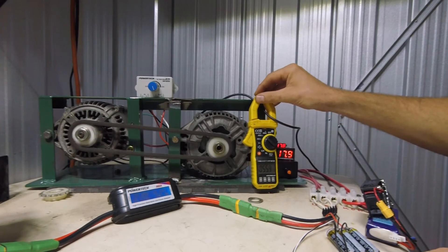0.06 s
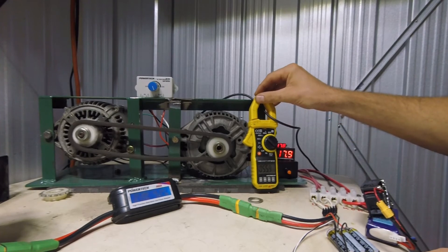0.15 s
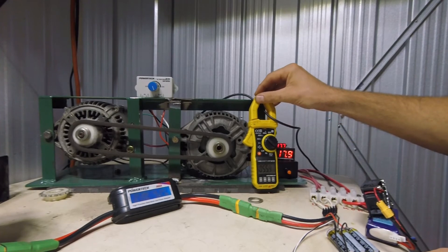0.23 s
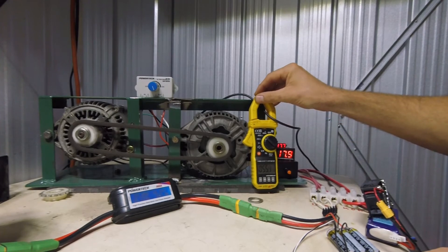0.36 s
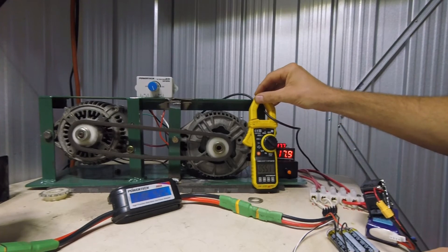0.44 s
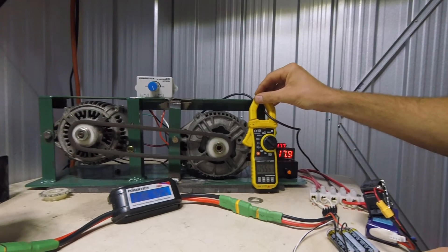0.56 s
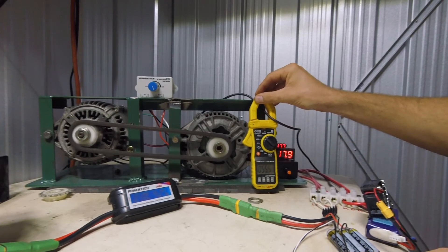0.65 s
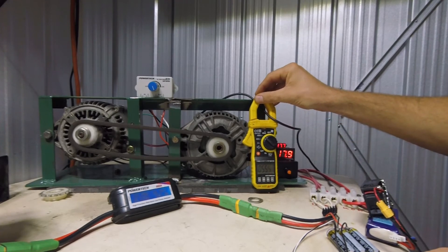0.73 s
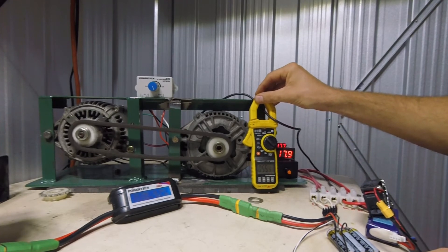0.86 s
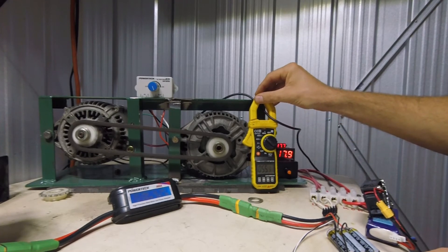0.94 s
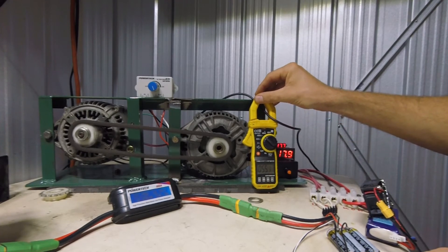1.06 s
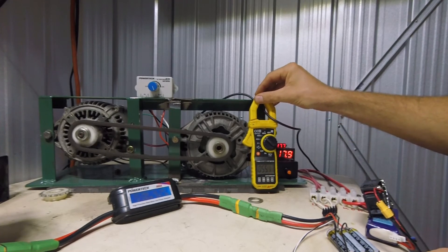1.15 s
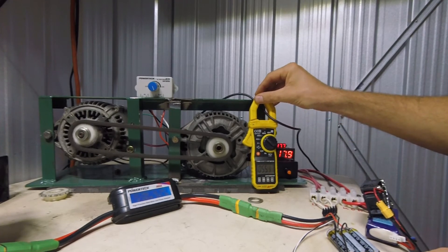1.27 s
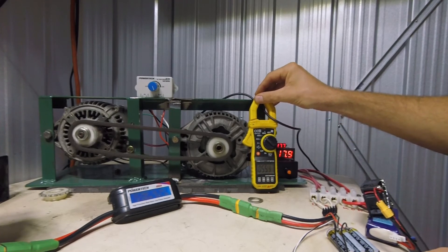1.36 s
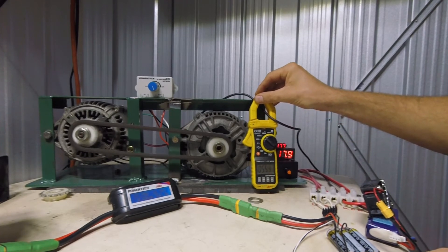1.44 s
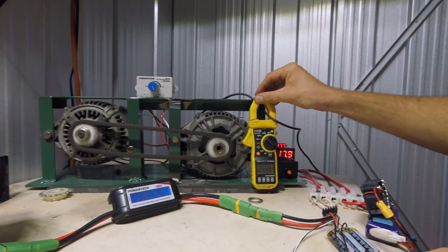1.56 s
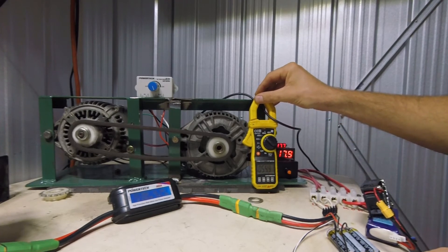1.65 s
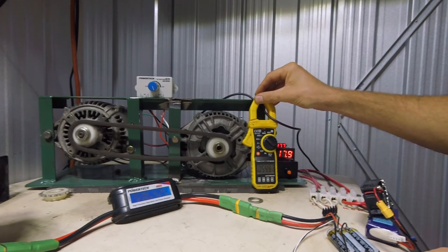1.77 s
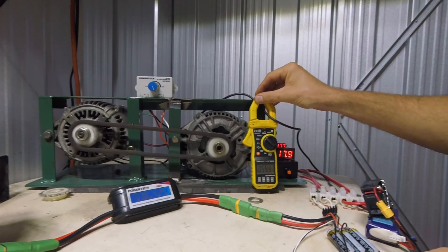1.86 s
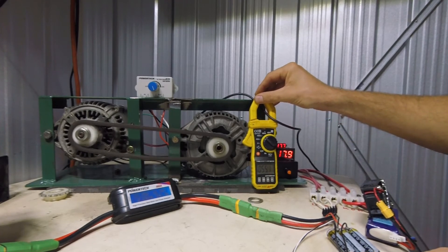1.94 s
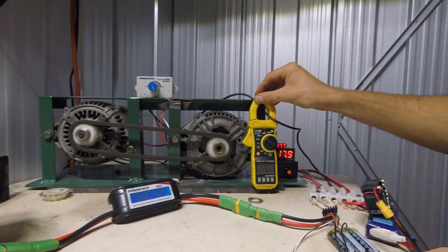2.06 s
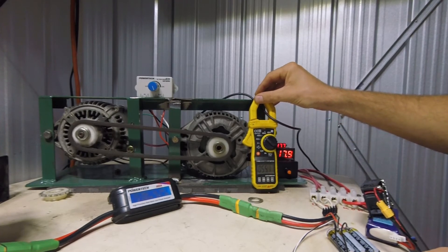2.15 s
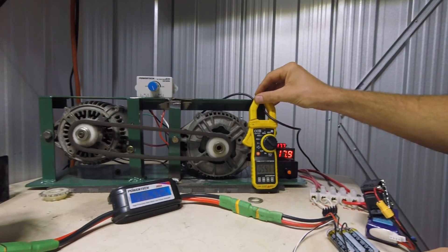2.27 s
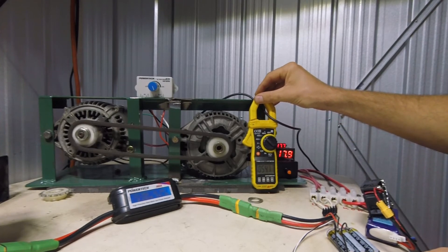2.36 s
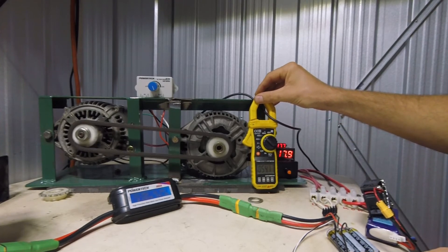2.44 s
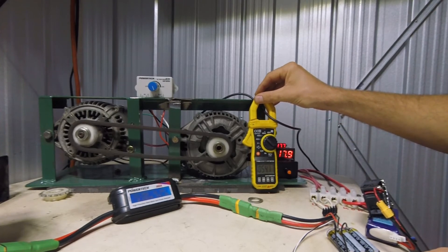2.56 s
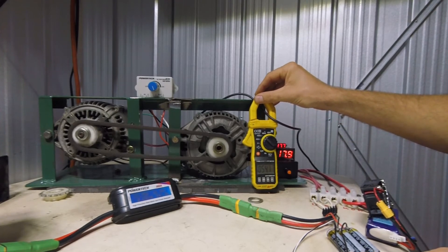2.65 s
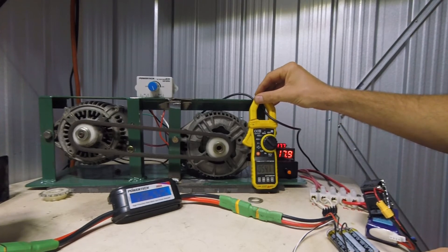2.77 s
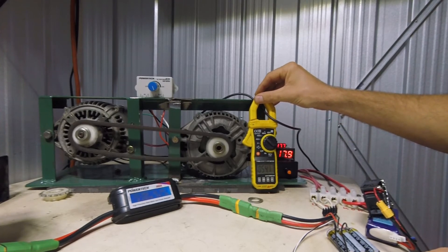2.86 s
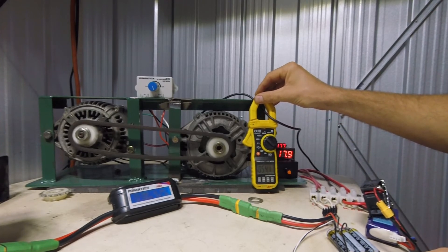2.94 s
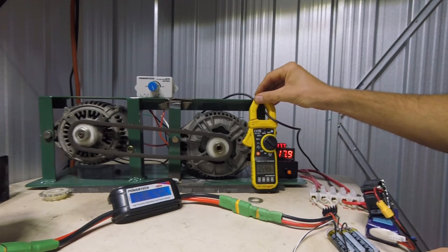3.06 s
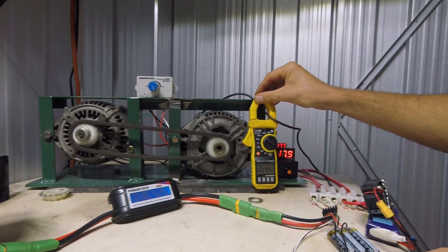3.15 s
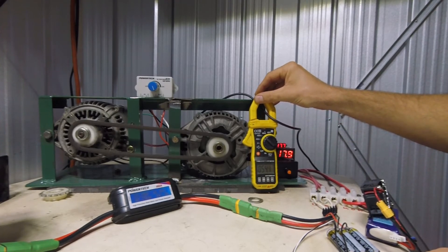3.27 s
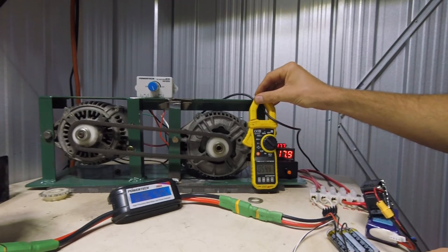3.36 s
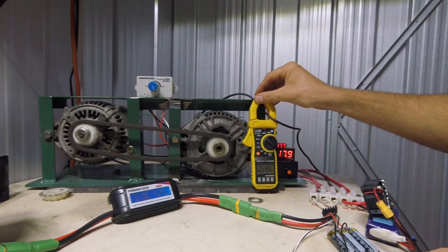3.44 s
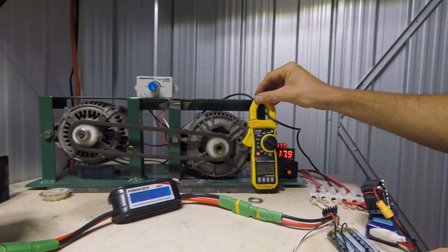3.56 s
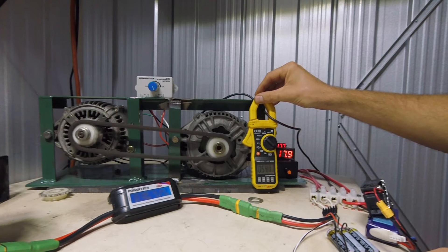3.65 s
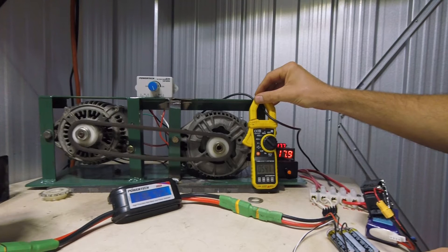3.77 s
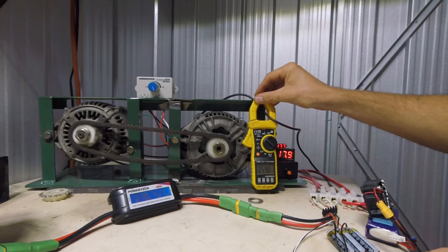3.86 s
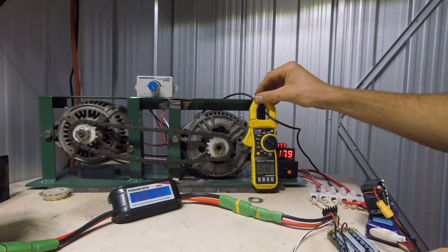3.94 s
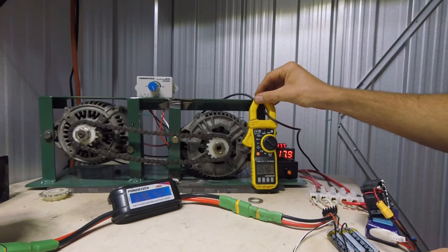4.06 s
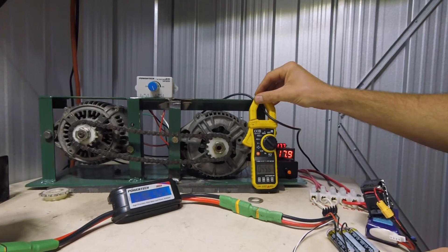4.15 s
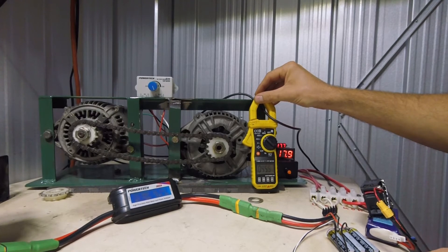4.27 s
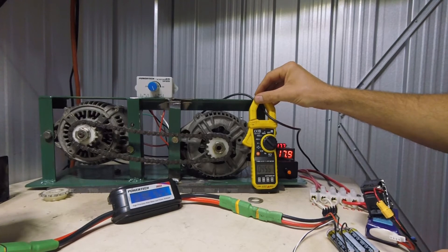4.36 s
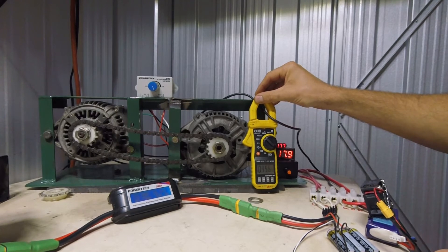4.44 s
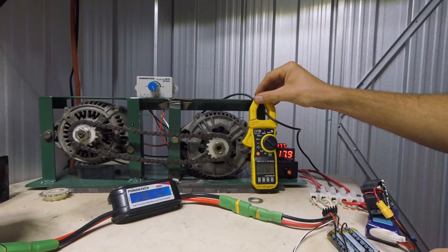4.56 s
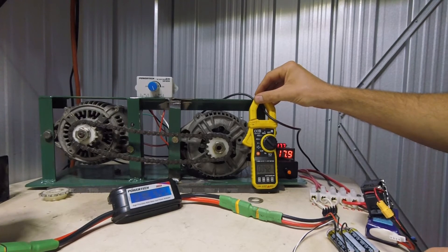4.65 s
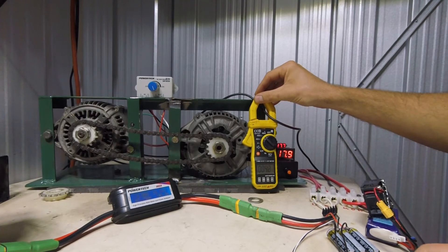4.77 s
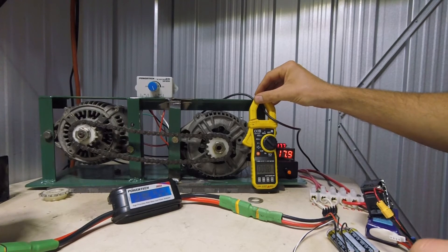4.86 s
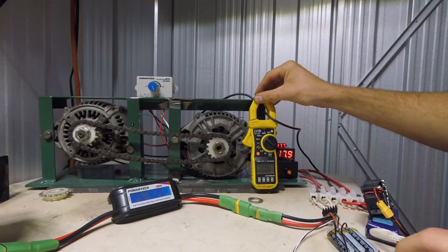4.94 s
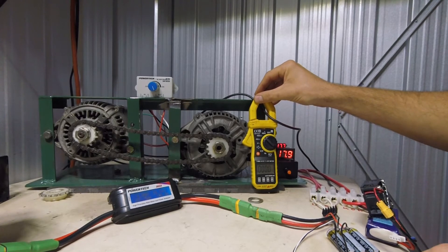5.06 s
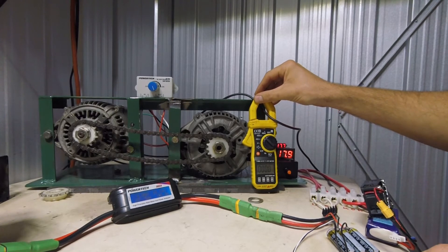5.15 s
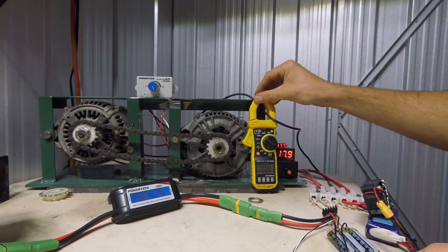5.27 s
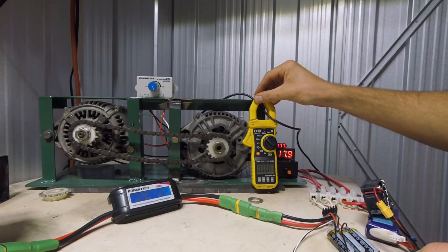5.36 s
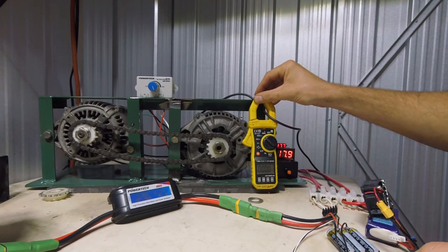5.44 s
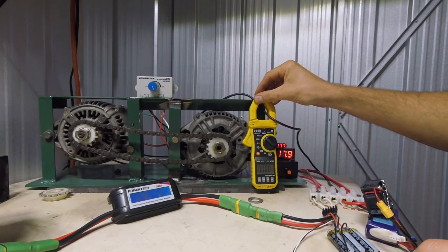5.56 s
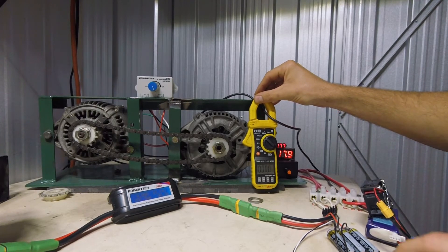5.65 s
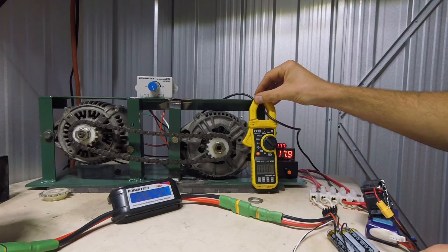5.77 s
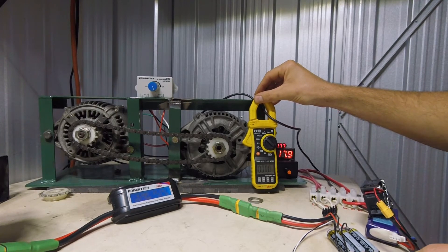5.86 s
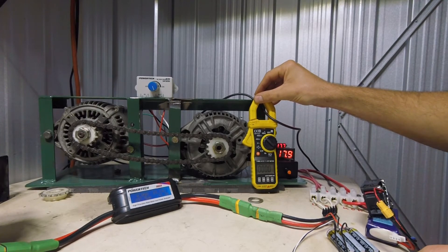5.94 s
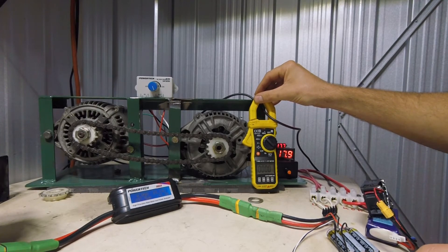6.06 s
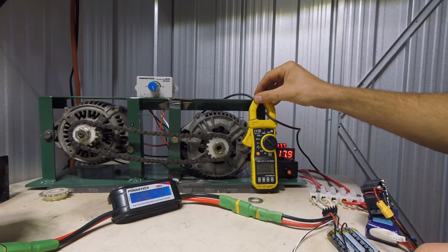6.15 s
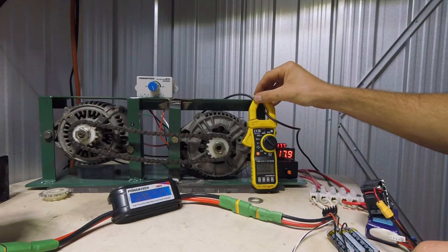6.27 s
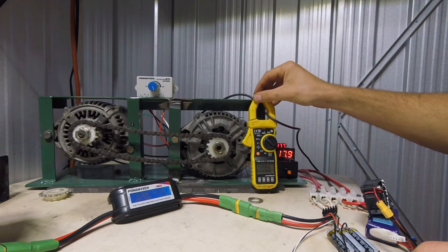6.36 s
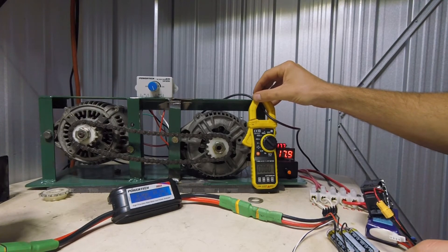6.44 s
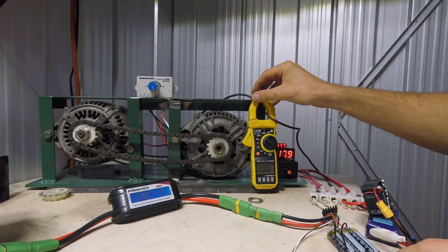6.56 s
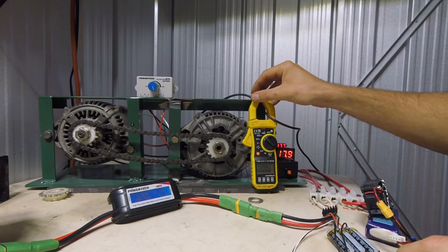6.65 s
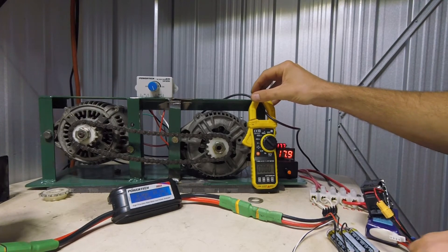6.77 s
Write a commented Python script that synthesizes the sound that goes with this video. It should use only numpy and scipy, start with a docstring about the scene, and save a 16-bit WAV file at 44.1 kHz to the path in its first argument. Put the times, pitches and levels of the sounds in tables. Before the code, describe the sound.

A loud, buzzing low drone with wavering metallic singing and fast chain chatter fills a small metal shed, heard from the bench. Thin panels boom now and then. The machine suddenly jams, clanks and drops out; loose parts shudder rapidly, then calm as the bench settles. Small taps follow about a second later, leaving thin fan whine and soft air rush.

```python
"""A car alternator wired as a motor drives a second alternator by a roller chain, on a steel frame in a tin shed.
Its fourteen poles hum as sine waves, noisy torque steps ring frame and housings, and the chain ticks and hisses.
The drive stalls with jolts that ring the frame; the hum, shaking and chain fade away, and the bench rocks itself
still amid rattling parts. Panels boom and ring, a few light taps follow, and a small fan whines throughout."""
import sys
import numpy as np
from scipy import signal
from scipy.fft import rfft, irfft
from scipy.io import wavfile
from scipy.ndimage import uniform_filter1d, minimum_filter1d

SR = 44100
rng = np.random.default_rng(int(sys.argv[2]) if len(sys.argv) > 2 else 0)


def master(y):
    """Save y as 16-bit WAV."""
    cut = np.clip(np.atleast_2d(y).T, -1, 1)
    pcm = np.round(cut * 32767)  # scale
    wavfile.write(sys.argv[1], SR, pcm.astype(np.int16))


N = 300321
T = np.arange(N) / SR  # time of each sample [s]

# ways the frame and bench vibrate: (pitch [Hz], width [Hz], level when driven by noise of rms 1 [dB])
FRAME = [(49.9, 7.5, -28), (88.2, 5.5, -32.5), (124.9, 4, -36.5), (149.5, 7.7, -41.5), (183.8, 15, -32.5),
         (210.5, 14.4, -33.5), (247, 33, -49), (293.5, 21.3, -24.5), (316.5, 20, -30.5), (360, 7.9, -28),
         (395.4, 11.7, -39), (491.5, 38, -33)]
# colour of loose parts rattling on the bench: (frequency [Hz], relative level per Hz [dB])
RATTLE = [(20, -10), (35, 7), (55, -2), (85, 2), (120, -15.5), (160, -12.5), (210, -7.5), (260, -21.5),
          (400, -26.5), (900, -46), (4000, -100)]


def amp(db):
    """Turns decibels into a gain."""
    return 10 ** (np.asarray(db) / 20)


def unit(x):
    """Scales a sound to rms 1."""
    return x / np.sqrt(np.mean(x ** 2) + 1e-20)


def since(s):
    """Seconds since a moment; zero before it."""
    return np.maximum(T - s, 0)


def curves(rows):
    """Joins each column of a table by straight lines in time."""
    s, *columns = np.transpose(rows)
    return [np.interp(T, s, c) for c in columns]


def read(points, hz):
    """Reads a table of values between its points, on a log-frequency axis."""
    f, value = np.transpose(points)
    return np.interp(np.log(hz + 1), np.log(f + 1), value)


def drift(hz):
    """Slow random wandering of rms 1; changes much faster than the given rate are smoothed out."""
    f = np.fft.rfftfreq(N, 1 / SR)
    spectrum = rfft(rng.standard_normal(N))
    smooth = np.exp(-(f / hz) ** 2) * (f > 0)
    return unit(irfft(spectrum * smooth, N))


def colour(x, points, size=8192):
    """Filters a sound to the given spectrum, with no sound ahead of its cause and filter energy 1."""
    hz = abs(np.fft.fftfreq(size, 1 / SR))
    log_gain = np.log(amp(read(points, hz)))
    # this choice of phase packs the energy right after the cause
    response = np.exp(np.conj(signal.hilbert(log_gain)))
    taps = np.fft.ifft(response).real[:size // 2]
    return signal.oaconvolve(x, taps / np.linalg.norm(taps))[:N]


def ring(x, modes):
    """Lets a force ring damped modes that take a moment to build up; a wider mode dies sooner."""
    t, body = T[:SR], 0
    for k, (hz, width, db) in enumerate(modes):
        fall = np.exp(-np.pi * width * t)
        build_up = 1 - fall ** 6
        mode = fall * build_up * np.sin(2 * np.pi * hz * t)
        sign = (-1) ** k
        body = body + sign * amp(db) * mode / np.linalg.norm(mode)
    return signal.oaconvolve(x, body)[:N]


def strikes(cycles):
    """Makes a click at the start of each cycle."""
    return np.diff(np.floor(cycles), prepend=np.floor(cycles[0]))


def tone(cycles, db):
    """A sine of the given rms level, starting at a random point of its cycle."""
    return np.sqrt(2) * amp(db) * np.sin(2 * np.pi * (cycles + rng.random()))


def shed(x, wet_db):
    """Adds scattered random reflections from the tin walls; each band dies at its own pace, the treble first."""
    # time to fall by 60 dB: (frequency [Hz], time [s])
    room = [(60, .35), (300, 0.19), (1500, 1), (5000, 0.22), (14000, 0.03)]
    length = SR // 2
    kept = rng.random(length) < .06
    taps = rng.standard_normal(length) * kept * (T[:length] > .004)
    hz, t, z = signal.stft(taps, SR, nperseg=256)
    fading = amp(-60 * t / read(room, hz)[:, None])
    tail = signal.istft(z * fading, SR, nperseg=256)[1]
    return x + amp(wet_db) * signal.oaconvolve(x, tail / np.linalg.norm(tail))[:N]


def fan():
    """The fan and power supply whine in thin, slightly wavering sines, amid a soft rush of filtered noise."""
    # whine of the fan and power supply: (pitch [Hz], level before wavering [dB])
    whine_lines = [(495.3, -52), (689.1, -52), (796.7, -58.5), (925.9, -60), (974.4, -64.5), (1136, -80),
                   (1378, -55.5), (1421, -60), (1701, -67), (1766, -64), (2073, -63), (2223, -66),
                   (2756, -58.5), (3451, -69)]
    # low tones of the fan's bearings: (pitch [Hz], level before wavering [dB])
    bearing_lines = [(285, -50.5), (309, -51), (353, -61)]
    # rush of air: (frequency [Hz], relative level per Hz [dB])
    air_spectrum = [(30, -2), (80, -3.5), (150, -5.5), (240, -0.5), (310, -7.5), (420, -11), (540, -16),
                    (850, -15.5), (1200, -15.5), (1850, -20), (2500, -17.5), (3200, -24), (4000, -27),
                    (4700, -34), (11000, -38.5), (15000, -53)]
    # resonances in the air noise: (pitch [Hz], width [Hz], level [dB])
    air_modes = [(2777, 180, -57), (6400, 790, -63.5), (878, 150, -52), (222, 54, -51)]
    air_db, waver_db = -41, 1.2
    time = T + np.cumsum(.0005 * drift(hz=4)) / SR  # all lines share a tiny pitch waver
    whine = sum(tone(hz * time, db + waver_db * drift(hz=5.7)) for hz, db in whine_lines + bearing_lines)
    rush = amp(air_db) * colour(rng.standard_normal(N), air_spectrum)
    return whine + rush + ring(rng.standard_normal(N), air_modes)


def handling(frame_db=14):
    """Something light is touched: short, fading noise bursts ring modes of their own and nudge the frame."""
    # taps and scuffs: (time [s], burst level before ringing [dB], pitch [Hz], width [Hz], decay [s])
    taps = [(4.76, -43, 3000, 2000, .008), (4.819, -37, 2200, 1800, 0.02), (4.889, -25, 1010, 330, 0.0047),
            (4.893, -31, 450, 500, 0.0088), (4.977, -38, 1050, 400, .014)]
    out, force = np.zeros(N), np.zeros(N)
    for s, db, hz, width, decay in taps:
        burst = amp(db) * (T >= s) * np.exp(-abs(T - s) / decay) * rng.standard_normal(N)
        out += ring(burst, [(hz, width, 0)])
        force += burst
    return out + amp(frame_db) * ring(force, FRAME)


def nudges():
    """Soft nudges stir the loose parts on the bench: swells of rattle-coloured noise."""
    # (time of peak [s], peak level [dB], time from peak to 1/e [s])
    pushes = [(4.89, -28, 0.046), (5.127, -27.5, 0.067), (5.34, -29, 0.056)]
    push = sum(amp(db) * np.exp(-((T - s) / length) ** 2) for s, db, length in pushes)
    return colour(push * rng.standard_normal(N), RATTLE)


def low_panel():
    """The rocking sets a lower panel ringing: a wavering sine that builds up and slowly dies away."""
    pitch_hz, start_s, rise_s = 142.2, 3.9, 0.43
    start_db, fall_db_per_s, waver_db = -33, 6.5, 1.5
    t = since(start_s)
    db = start_db - fall_db_per_s * t + waver_db * drift(hz=4)
    cycles = pitch_hz * np.cumsum(1 + 0.0074 * drift(hz=3.5)) / SR
    return np.minimum(t / rise_s, 1) * tone(cycles, db)


def rocking(sway_db=-20, sway_power=3.4, overtone_db=-8, knock_db=4):
    """The bench sways on its legs until friction stills it; loose parts crash, thud and blur into a rumble."""
    stall_s, rise_s, lasts_s, rock_hz = 3.78, .25, 3.48, 17.4
    crash_db, crash_fall_db_per_s = -9, 55
    rumble_db, rumble_power = -27, 1.36
    t = since(stall_s)
    motion = np.clip(1 - t / lasts_s, 1e-6, 1)
    sway = np.minimum(t / rise_s, 1) ** 2 * motion ** sway_power
    swings = rock_hz * (t - rise_s)
    swing = np.cos(2 * np.pi * swings)
    # the feet press down at both ends of a swing
    press = amp(overtone_db) * np.cos(2 * np.pi * 2 * swings)
    legs = np.sqrt(2) * amp(sway_db) * sway * (swing + press)
    # the wider the swing, the more the loose parts are thrown in step
    thuds = colour(rng.standard_normal(N) * amp(knock_db * sway * swing), RATTLE)
    crash = amp(crash_db - crash_fall_db_per_s * t)
    rumble = amp(rumble_db) * motion ** rumble_power
    return legs + np.minimum(t / 0.025, 1) * np.hypot(crash, rumble) * thuds


def stall():
    """The rotor stalls and the chain snatches back and forth, each shudder ringing the frame."""
    # shudders: (time of peak [s], force level [dB], judder rate [Hz], time from peak to 1/e [s])
    jolts = [(3.764, 0, 229.6, 0.027), (3.802, -3, 110, 0.011), (3.82, -15, 307, 0.013),
             (3.827, -11.5, 48.6, 0.034), (3.829, -6.5, 387.3, 0.027), (3.837, 3, 250, 0.00053)]
    force = 0
    for s, db, hz, length in jolts:
        swell = amp(db) * np.exp(-((T - s) / length) ** 2)
        force = force + swell * np.cos(2 * np.pi * hz * (T - s))
    return ring(force, FRAME)


def booms(shake, murmur_db=-31, rest_db=-50, flutter_db=0.7):
    """A thin panel hums, louder while the frame shakes; extra sines swell and fade as booms."""
    # (start [s], length [s], pitch before wavering [Hz], level at the peak before flutter [dB])
    swells = [(-.08, 0.2, 180, -12.5), (.78, 0.35, 178.4, -16.5), (1.1, 0.33, 364, -22),
              (1.75, 0.18, 178.4, -18.5), (2.02, .21, 178.4, -21), (3.77, 0.23, 178.4, -19),
              (4.5, 0.62, 178.4, -37), (5.62, .38, 178.4, -40.5), (6.45, .5, 178.4, -36.5)]
    panel_hz, swell_db = 177.5, 3.5
    time = np.cumsum(1 + 0.0038 * drift(hz=3.8)) / SR  # a shared pitch waver
    loudness = shake * amp(murmur_db) + amp(rest_db)
    out = loudness * tone(panel_hz * time, swell_db * drift(hz=6))
    flutter = flutter_db * drift(hz=14)
    for s, length, hz, db in swells:
        swell = np.sin(np.pi * np.minimum(since(s) / length, 1))
        out = out + swell * tone(hz * time, db + flutter)
    return out


def singing(waver_db=0.5, level_db=1.5):
    """Lightly damped housing modes sing on: sines whose pitch and level wander a little at random."""
    # (pitch [Hz], level before the common lift and the shaking [dB], rms pitch wander [Hz])
    notes = [(755, -38, 3.8), (980, -33.5, 2.23), (1087, -34, 6.24), (1175, -39.5, 6.5), (1350, -32, 7.44)]
    out = 0
    for hz, db, wander in notes:
        cycles = np.cumsum(hz + wander * drift(hz=25)) / SR
        out = out + tone(cycles, db + level_db + waver_db * drift(hz=21.6))
    return out


def chain(turns, tick_db=-39.5, hiss_db=-36.0, slack_db=.5, scatter_db=3):
    """Each tooth seats a roller with a short noisy tick, stressed by quarter turn, over a grainy hiss."""
    # force of the slap at each quarter turn, before scatter: one level for each quarter [dB]
    slaps = [1, 0.5, 4.5, -11.5]
    # tick of one tooth: (frequency [Hz], relative level per Hz [dB])
    tick_spectrum = [(1200, -24), (2400, -0.5), (3500, 11), (4300, 9), (4900, -2.5), (5600, -3.5),
                     (6300, 4), (7500, -21), (11000, -25), (15000, -54)]
    # hiss of the rollers: (frequency [Hz], relative level per Hz [dB])
    hiss_spectrum = [(900, -19.5), (1750, -0.5), (2400, 2.5), (3000, -2), (4250, -4.5), (4750, -11),
                     (5500, -9.5), (6050, -4), (6550, -12), (7200, -18), (7900, -23), (11000, -26.5),
                     (13500, -37), (15500, -56)]
    teeth_per_turn, tooth_fall_db, tick_s = 16, 3.5, .0013
    teeth = teeth_per_turn * turns - .45 + .05 * drift(hz=30)  # the timing is slightly uneven
    tooth = np.floor(teeth).astype(int) % teeth_per_turn
    quarter, after_slap = np.divmod(tooth, teeth_per_turn // len(slaps))
    scatter = scatter_db * (2 * rng.random(N) - 1)
    # each tooth after a slap seats more softly
    force = amp(np.array(slaps)[quarter] - tooth_fall_db * after_slap + scatter)
    seating = signal.lfilter([1], [1, -np.exp(-1 / (tick_s * SR))], strikes(teeth) * force)
    # random signs turn each fading push into a burst of noise
    ticks = colour(unit(seating * rng.choice([-1, 1], N)), tick_spectrum)
    hiss = colour(unit(rng.standard_normal(N) * amp(1.8 * drift(hz=700))), hiss_spectrum)
    # the chain is louder and softer as it slackens and tightens
    slack = amp(slack_db * drift(hz=26))
    return (amp(tick_db) * ticks + amp(hiss_db) * hiss) * slack


def shaking(field, level, clatter_db=-26, step_share=0.38):
    """Uneven torque steps and the rattle between them ring the frame and the housings."""
    # modes of the alternator housings: (pitch [Hz], width [Hz], level when driven by noise of rms 1 [dB])
    housing = [(627, 32, -43.5), (710, 26, -38.5), (749, 12, -47.5), (838, 23, -37), (915, 19, -33),
               (983, 35, -45.5), (1036, 46, -38.5), (1093.5, 18, -33.5), (1107, 40, -32),
               (1177.5, 35, -35.5), (1212, 15, -34.5), (1302, 53, -35), (1336, 28, -31.5), (1400, 32, -32),
               (1491, 23, -36.5), (1624, 11, -51)]
    # clatter of chain and bearings: (frequency [Hz], relative level per Hz [dB])
    clatter = [(25, 4.5), (100, 0.5), (330, 1.5), (450, -7.5), (580, -7), (850, -13.5), (1100, -4.5),
               (1400, -15.5), (1650, -5.5), (1850, -22), (3000, -46), (8000, -80)]
    steps_per_cycle = 6
    step_clicks = strikes(steps_per_cycle * field + .12 * drift(hz=199.9))
    steps = unit(step_clicks * rng.standard_normal(N))
    # the rattle swells once each electrical cycle
    rattle = unit(rng.standard_normal(N) * amp(3.7 * np.cos(2 * np.pi * field)))
    force = level * (np.sqrt(step_share) * steps + np.sqrt(1 - step_share) * rattle)
    return ring(force, FRAME + housing) + amp(clatter_db) * colour(force, clatter)


def hum(field):
    """The poles pull on the stator once each electrical cycle: sines at its multiples, fluttering at random."""
    # (multiple of the electrical frequency, level before flutter and pull [dB], rms flutter [dB])
    overtones = [(1, -14.5, 0.8), (2, -31.5, 1.5), (3, -27, 2.5), (6, -49, 8), (7, -40, -0.5), (9, -53, 9),
                 (10, -44.5, 3.5), (11, -37.5, -0.5), (13, -50.5, 4.5), (14, -41.5, 8.5)]
    return sum(tone(round(k) * field, db + waver * drift(hz=11.4)) for k, db, waver in overtones)


def shaft():
    """Counts the turns made so far; the speed controller hunts gently about the set speed."""
    # set speed, held after the last row: (time [s], speed [turns per second])
    set_speed = [(0, 9.967), (0.3, 10.023), (1.1, 10.093), (1.5, 10.028), (2.3, 9.964), (2.7, 9.877),
                 (3.1, 10.016), (3.75, 9.749)]
    hunt_hz, hunt_turns_per_s, hunt_peak_s = 1.64, .088, .484
    hunting = hunt_turns_per_s * np.cos(2 * np.pi * hunt_hz * (T - hunt_peak_s))
    return np.cumsum(curves(set_speed)[0] + hunting) / SR


def scene():
    """One shaft times the hum, the shaking and the chain; their levels fall away at the stall."""
    # how hard the rig runs: (time [s], magnetic pull [dB], shaking of the metal [dB], chain [dB])
    drive = [(0, 2.5, 0, 0.5), (3.7, 2.5, -0.5, 0.5), (3.77, 0, -0.5, 1.5), (3.81, -9, -3.5, -5),
             (3.86, -42, -7, -9), (3.92, -68, -17, -19), (4.0, -86.5, -30, -39), (4.2, -84, -61, -59.5)]
    pole_pairs = 7
    turns = shaft()
    field = pole_pairs * turns  # electrical cycles so far
    pull, shake, run = amp(curves(drive))
    motor = pull * hum(field) + shaking(field, shake) + shake * singing() + booms(shake)
    bright = shed(run * chain(turns) + handling(), wet_db=-11.5)
    bench = stall() + rocking() + nudges() + low_panel()
    return (motor + bright + bench + fan())[None]


def record(dry):
    """A fast limiter holds the highest peaks down; then a steep filter removes the very top of the treble."""
    edge_hz = 14800
    headroom = np.minimum(1, .9 / (abs(dry) + 1e-9))
    lowest = minimum_filter1d(headroom, size=400)
    gain = uniform_filter1d(uniform_filter1d(lowest, size=200), size=200)
    band_limit = signal.firwin(255, edge_hz, window=("kaiser", 9), fs=SR)
    return signal.oaconvolve(dry * gain, band_limit[None], "same")


dry = scene()
out = record(dry)
master(out)
```